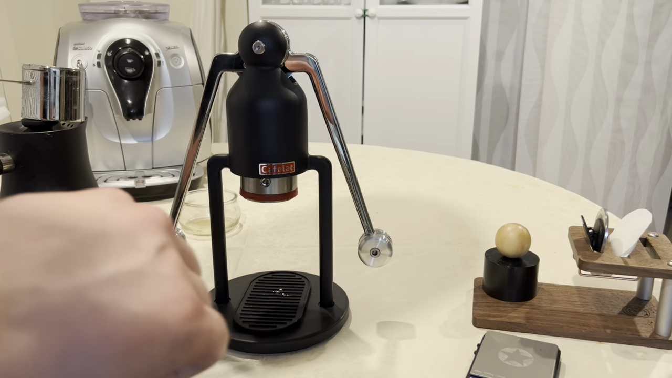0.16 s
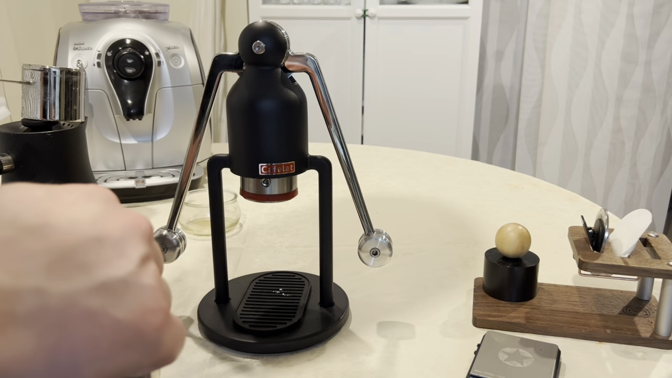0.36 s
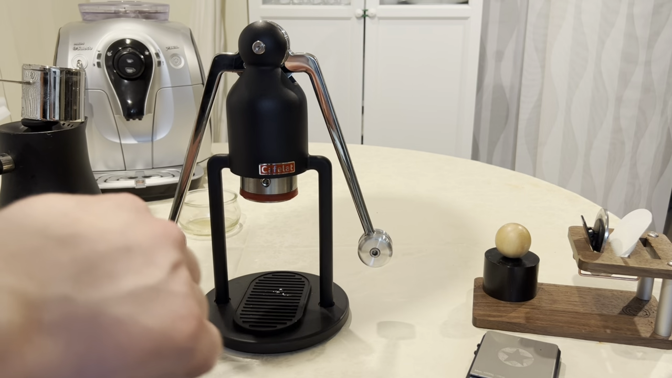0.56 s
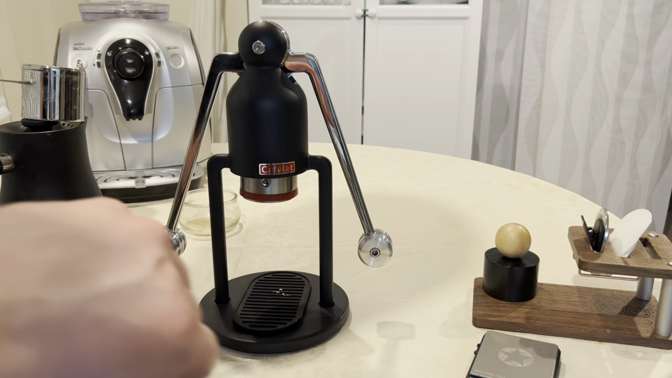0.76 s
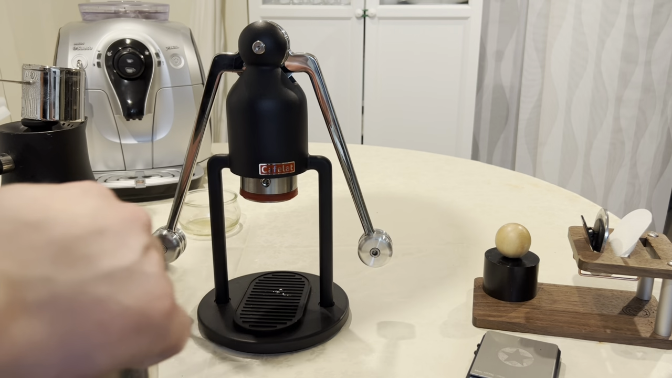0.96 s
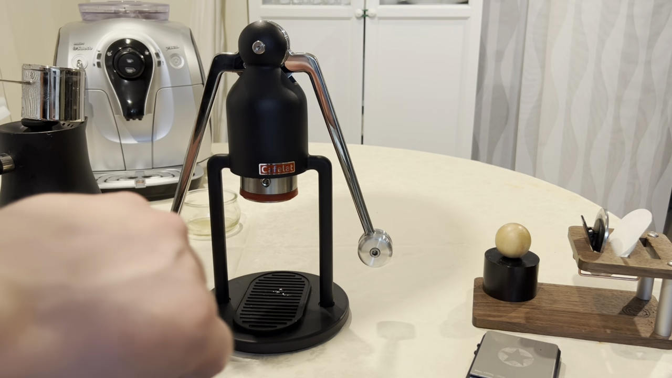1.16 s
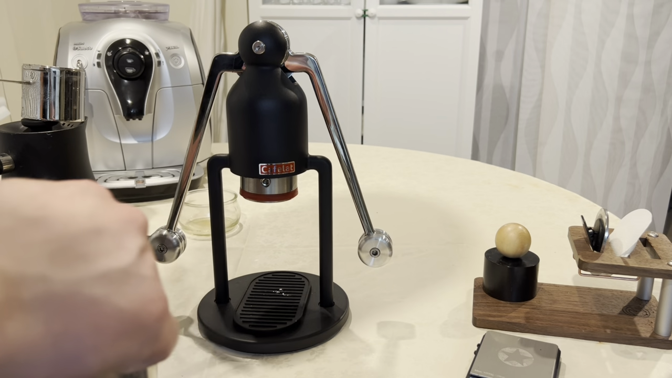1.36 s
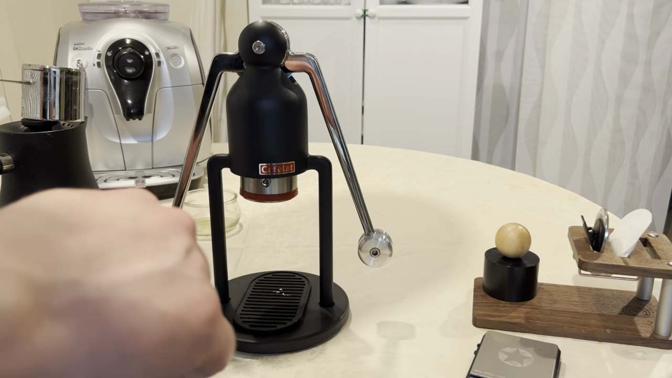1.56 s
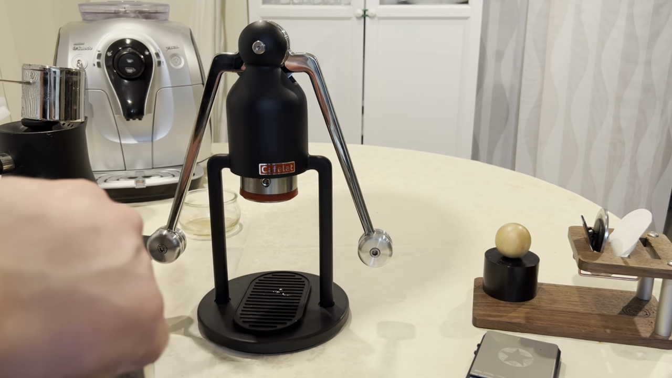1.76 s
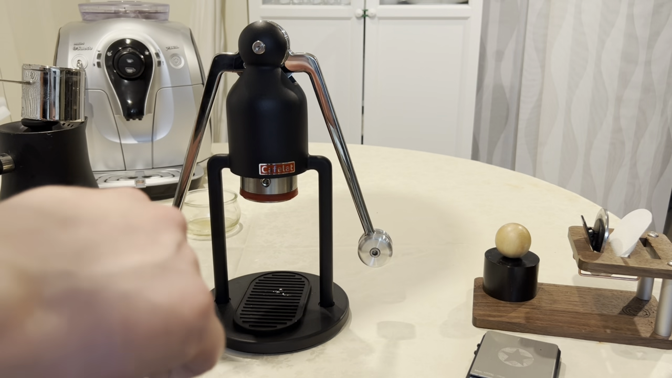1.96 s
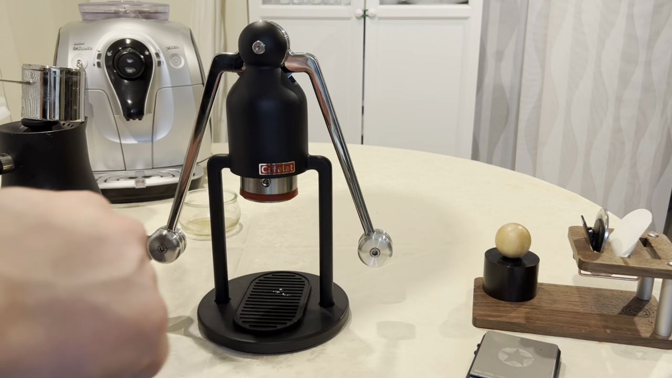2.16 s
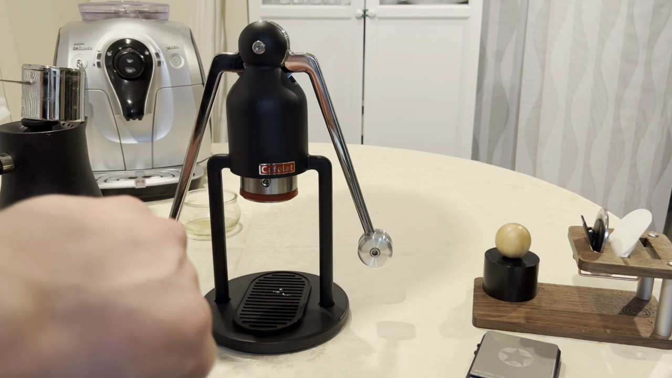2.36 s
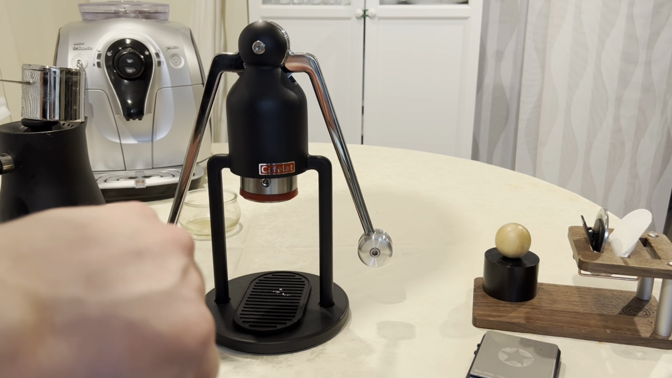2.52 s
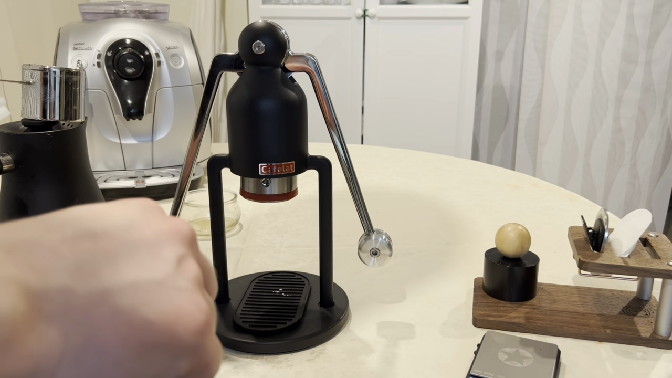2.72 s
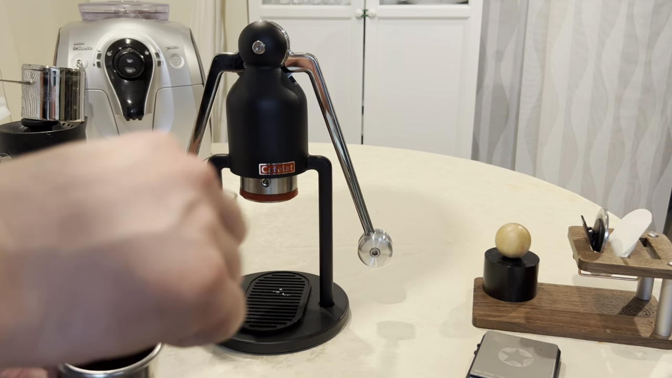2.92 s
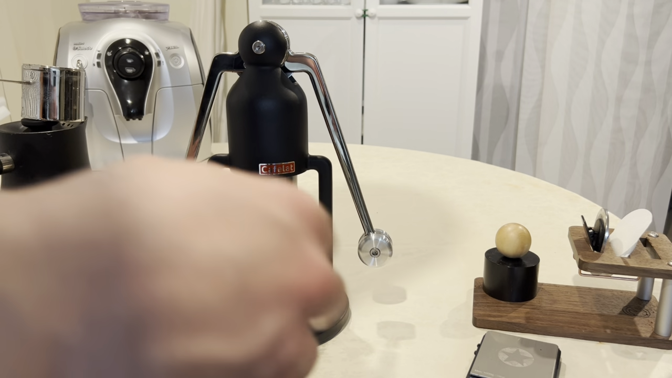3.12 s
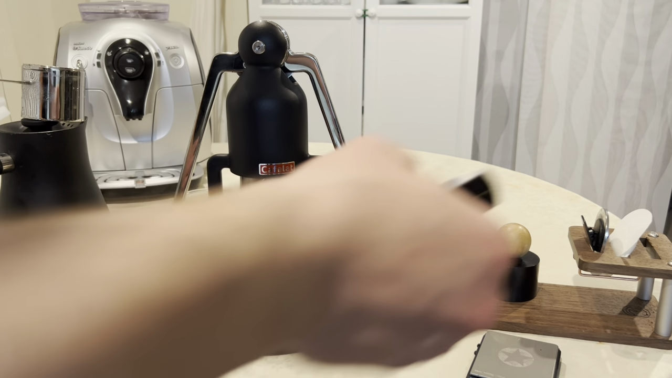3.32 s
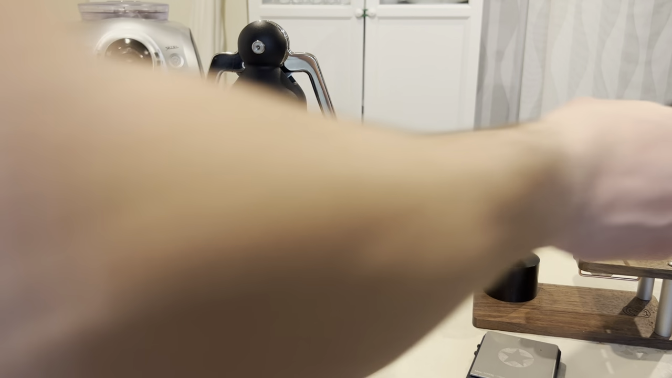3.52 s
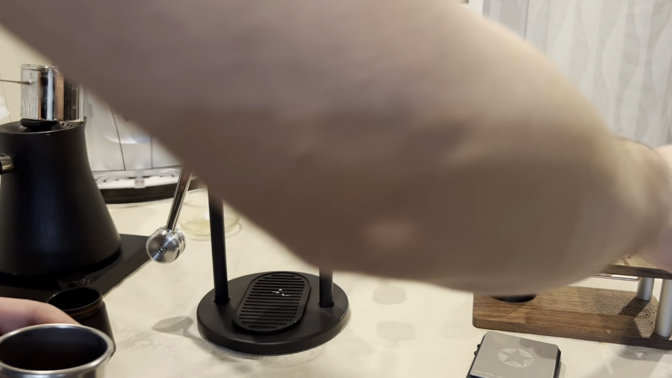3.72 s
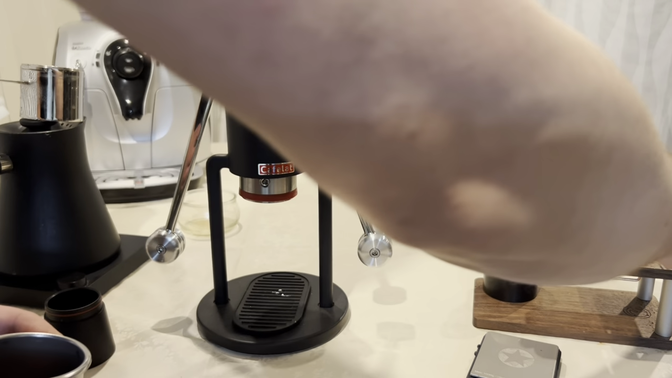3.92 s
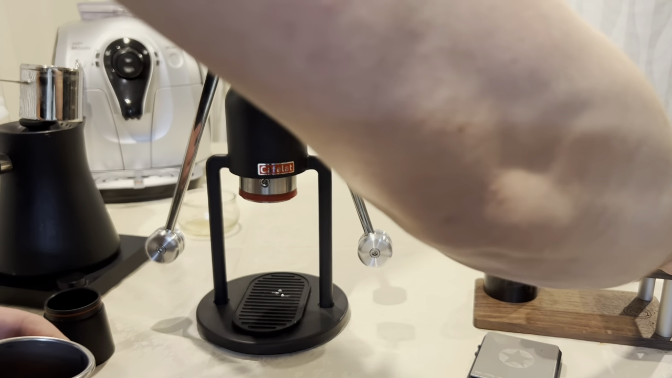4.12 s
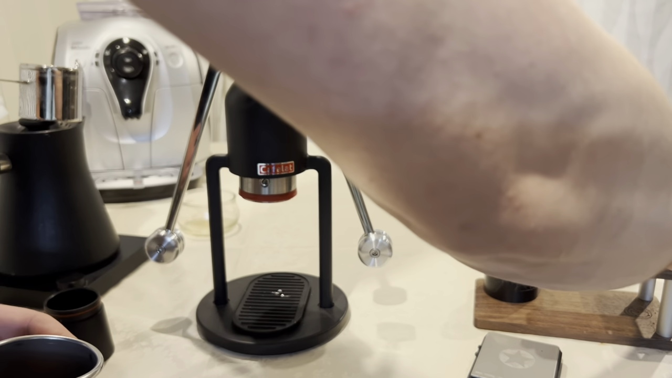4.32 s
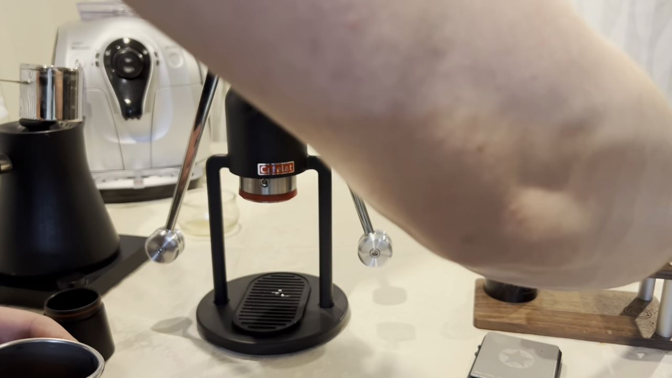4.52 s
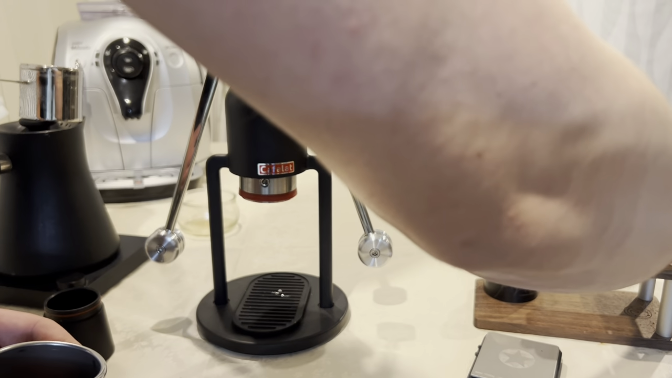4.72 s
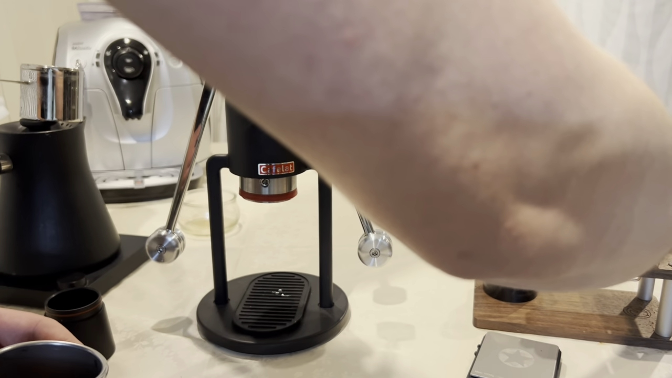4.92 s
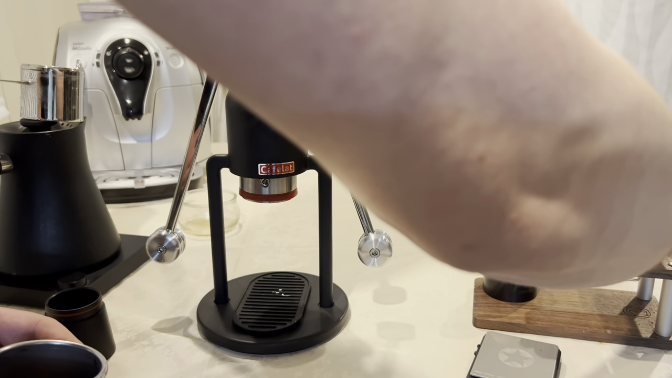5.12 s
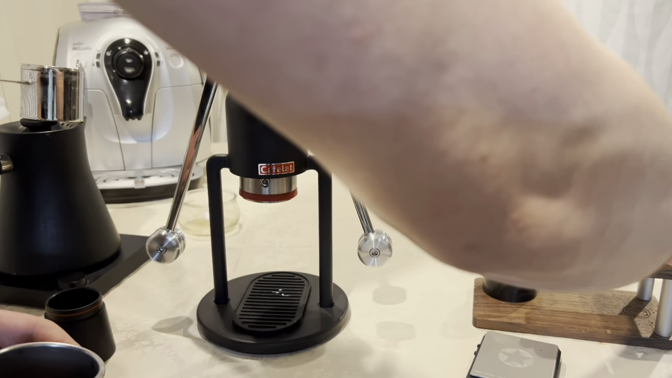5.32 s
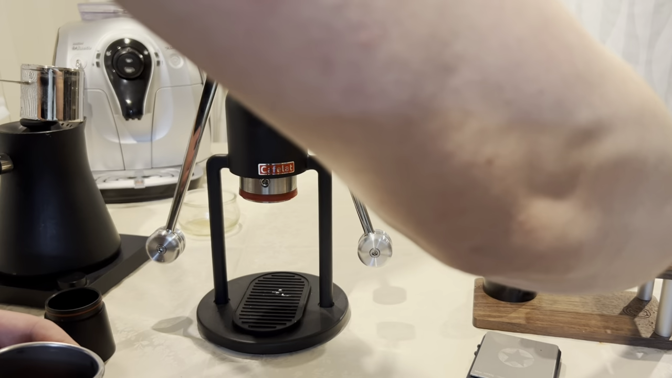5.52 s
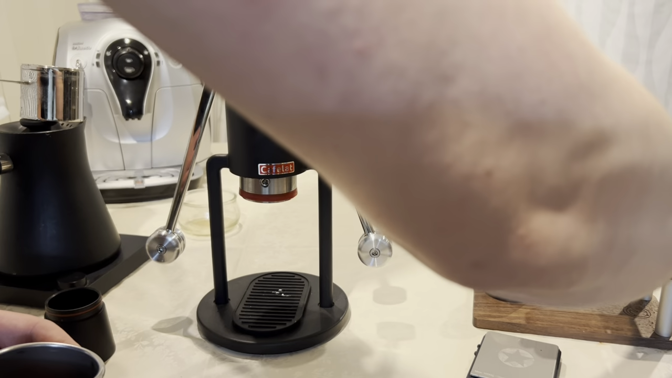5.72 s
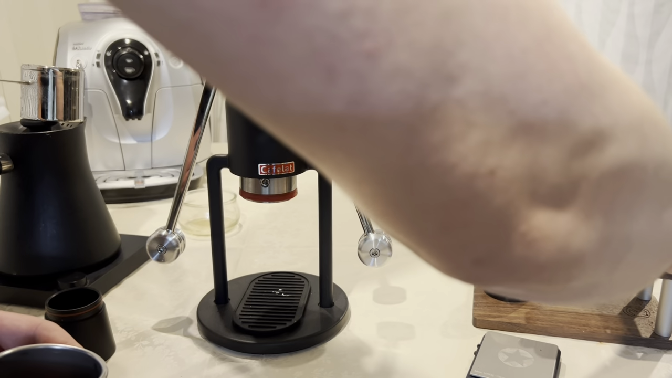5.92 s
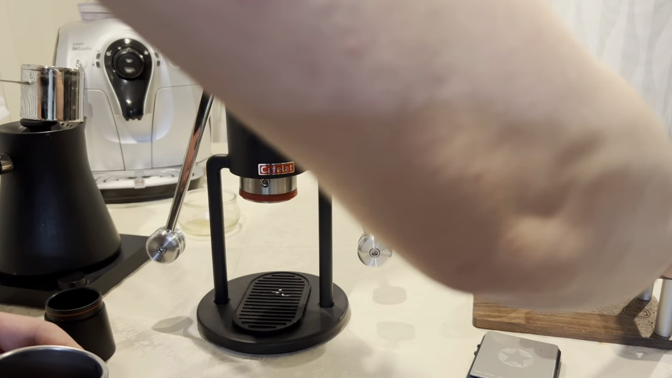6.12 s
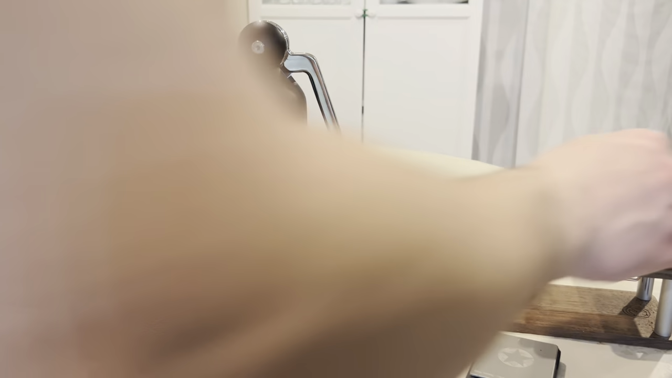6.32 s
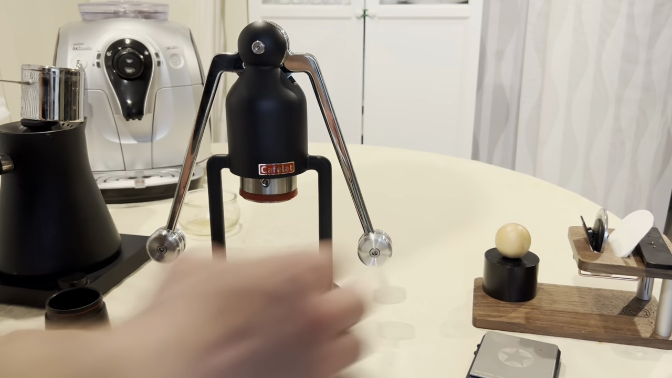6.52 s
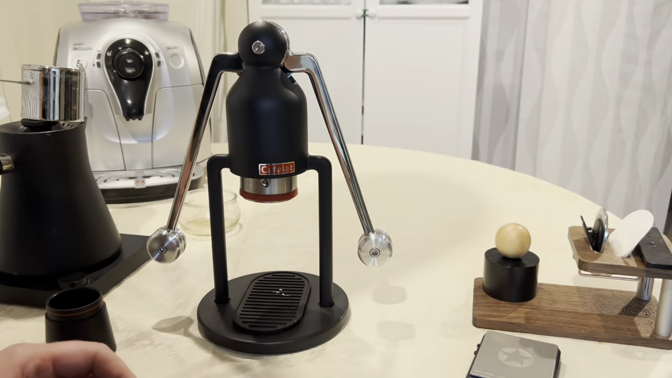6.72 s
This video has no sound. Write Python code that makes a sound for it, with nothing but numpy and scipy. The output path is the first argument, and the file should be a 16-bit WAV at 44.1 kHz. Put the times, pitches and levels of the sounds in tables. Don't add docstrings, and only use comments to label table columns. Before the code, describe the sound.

Fine needles scratch and tick through ground coffee in a small steel basket, a clink ends it, then a tool knocks into a wooden stand.

```python
import sys
import numpy as np
from scipy import signal
from scipy.fft import rfft, irfft, next_fast_len
from scipy.io import wavfile

SR = 44100
rng = np.random.default_rng(int(sys.argv[2]) if len(sys.argv) > 2 else 0)


def wrap_up_sound(samples):
    columns = np.atleast_2d(samples).T
    tamed = np.clip(columns, -1, 1)
    steps = np.round(tamed * 32767).astype(np.int16)
    wavfile.write(sys.argv[1], SR, steps)


def volts(x):
    e = np.asarray(x, float) / 20
    return 10 ** e


N = 298557
SIZE = next_fast_len(N + SR)
HZ = np.arange(SIZE // 2 + 1) * SR / SIZE

# start in seconds, peak in dB, thump in dB.
KNOCKS = [
    (5.994, -10.5, -49),
    (6.002, -16.5, -28),
    (6.018, -22.5, -31.5),
    (6.011, -9, -35.5),
    (6.039, -41, -29.5),
    (6.058, -12.5, -40),
    (6.072, -20.5, -38),
    (6.082, -38, -32.5),
    (6.099, -51, -30),
]
# pitch in Hz, phase in half turns.
PORTS = [(8200, 0), (9300, -.93), (11200, -1.08), (12600, -1.88), (14500, -2.05), (15300, -2.6)]


def rms_one(x):
    return x / np.sqrt(np.mean(x ** 2) + 1e-20)


def in_time(rows):
    s, *columns = np.transpose(rows)
    return [np.interp(np.arange(N) / SR, s, c) for c in columns]


def at_hz(points, hz=HZ):
    f, value = np.transpose(points)
    return np.interp(np.log(hz + 1), np.log(f + 1), value)


def coloured(spectrum, weight=1):
    white = rfft(rng.standard_normal(SIZE))
    return rms_one(irfft(white * volts(at_hz(spectrum)) * weight, SIZE)[:N])


def drift(rate):
    r = np.exp(-2 * np.pi * rate / SR)
    return rms_one(signal.lfilter([1], [1, -2 * r, r * r], rng.standard_normal(N + SR))[SR:])


def grains(per_s, spread_db):
    sizes = volts(spread_db * np.minimum(rng.exponential(1, N), 4)) * rng.choice([-1, 1], N)
    return rms_one(sizes * (rng.random(N) < per_s / SR))


def resonance(x, hz, width):
    r = np.exp(-np.pi * width / SR)
    gain = (1 - r * r) / 2
    return signal.lfilter([gain, 0, -gain], [1, -2 * r * np.cos(2 * np.pi * hz / SR), r * r], x)


def glide(x, hz, width):
    turn = np.exp(2j * np.pi * np.cumsum(hz) / SR)
    r = np.exp(-np.pi * width / SR)
    return 2 * np.real(signal.lfilter([1 - r], [1, -r], x / turn) * turn)


def ring(clicks, hz, t60):
    r, w = volts(-60 / (t60 * SR)), 2 * np.pi * hz / SR
    return signal.lfilter([0, np.sin(w)], [1, -2 * r * np.cos(w), r * r], clicks + 1e-18)


def bursts(times, levels_db, lengths):
    out, t = np.zeros(N + 4000), np.arange(4000) / SR
    onset = np.minimum(t / 0.001, 1)
    for s, db, length in zip(times, levels_db, lengths):
        fade = np.exp(-t / max(length, .001)) + 0.14 * np.exp(-t / 0.0011)
        out[round(s * SR):][:len(t)] += volts(db) * fade * onset
    return out[:N]


def struck(hits, modes, scatter_db, soft):
    out, at = 0, [round(s * SR) for s, db in hits]
    chance = rng.standard_normal((len(hits), len(modes)))
    for k, (hz, db, t60) in enumerate(modes):
        strength_db = np.array(hits)[:, 1] + db + scatter_db * chance[:, k]
        clicks = np.zeros(N)
        clicks[at] = volts(strength_db) * np.sign(np.sin(9 * chance[:, k]))
        out = out + ring(clicks, hz, t60)
    return signal.lfilter([(1 - soft) ** 2], [1, -2 * soft, soft ** 2], out)


def kitchen():
    # time in seconds, rumble in dB.
    hum = [(0, -54), (.5, -59.5), (.8, -54.5), (.9, -69), (1.4, -66), (2.26, -68.5), (2.47, -58),
           (3.04, -58), (3.07, -62.5), (3.3, -68), (3.46, -69.5), (3.5, -72), (4.35, -70.5), (5.07, -58.5),
           (5.77, -58), (6.05, -53), (6.25, -55), (6.77, -61.5)]
    # pitch in Hz, level in dB per Hz.
    rumble = [(15, -55), (25, -15.5), (59, -4), (123, -6.5), (189, -5), (210, -10), (240, -2.5),
              (334, -1.5), (387, -17), (600, -19), (780, -48), (1320, -120)]
    # pitch in Hz, level in dB.
    air = [(240, -34), (400, 6), (600, -5), (1040, -7), (1730, -3.5), (2550, -17.5), (4050, -20),
           (6740, -22.5), (9000, -25), (11500, -13.5), (13500, -24.5), (15000, -16.5), (16000, -35)]
    # pitch in Hz, level in dB.
    air_side = [(240, -48), (400, -17), (620, -3), (840, -16.5), (1730, -13), (2550, -28.5), (6500, -32),
                (7600, -36.5), (9000, -34.5), (11600, -30), (12700, -52.5), (14300, -55.5), (15200, -32.5),
                (16000, -50.5)]
    # pitch in Hz, level in dB.
    whine = [(581.4, -92.5), (699.8, -91)]
    rumble_db, = in_time(hum)
    rumble_gain = volts(rumble_db - 2.0 + 3.2 * drift(5.4))
    air_db = -75.0 + 0.16 * (rumble_db + 63.0)
    t = np.arange(N) / SR
    tones = sum(volts(db + 6.0) * np.sin(2 * np.pi * hz * t) for hz, db in whine)
    alike = np.cos(np.pi * at_hz(PORTS) / 2) + 0.084
    mid = rumble_gain * coloured(rumble) + volts(air_db) * coloured(air, alike) + tones
    mid = mid + volts(-98 + 3 * drift(15)) * rms_one(resonance(rng.standard_normal(N), 13700, 200))
    side = rumble_gain * volts(-13.5) * coloured(rumble)
    side = side + volts(air_db - 0.5) * coloured(air_side) + .8 * tones
    return np.array([mid + side, mid - side])


def basket():
    # time in seconds, pressure in dB, rubbing on the wall in dB
    # re pressure, pitch of the air in the cup in Hz.
    stir = [(0.0, -50.5, -18.5, 1110), (0.14, -60, -8.5, 1000), (0.22, -57, -13, 1100),
            (0.32, -49, -8.5, 1046), (0.45, -59, -12, 980), (0.6, -49, -15, 1033), (0.72, -60, -52, 1000),
            (0.86, -48, -4, 980), (0.95, -54, -14.5, 964), (1.1, -52, -11, 1052), (1.18, -54.5, -36, 950),
            (1.26, -48.5, -6, 1076), (1.35, -52.5, -15.5, 974), (1.63, -54.5, -11.5, 1025),
            (2.0, -50.5, -13, 1024), (2.16, -53.5, -11, 1047), (2.25, -46.5, -13.5, 1006),
            (2.33, -44, -4, 1030)]
    # start in seconds, strength in dB, place (0 floor, 1/3 rim, 2/3 wall
    # and round again), scrape length in seconds.
    catches = [(0.031, -52, 0.02, 0.0091), (0.062, -46, 0.068, 0.023), (0.1, -46, 0.44, 0.032),
               (0.12, -30.5, 0.81, 0.0071), (0.182, -46.5, 0.45, 0.023), (0.209, -32.5, 0.84, 0.0082),
               (0.26, -55, 0.76, 0.0087), (0.29, -36.5, 0.058, 0.013), (0.336, -50, 1, 0.02),
               (0.473, -45, 0.13, 0.1), (0.52, -25.5, 0.79, 0.0076), (0.533, -48, 0.071, 0.0066),
               (0.576, -43, 0.85, 0.061), (0.704, -39.5, 0.42, 0.01), (0.7771, -27, 0.42, 0.011),
               (0.785, -29, 0.58, 0.011), (0.824, -36, 0.67, 0.0048), (1.026, -43, 0.14, 0.055),
               (1.062, -37, 0.85, 0.0082), (1.089, -37.5, 0.56, 0.025), (1.184, -36, 0.37, 0.0098),
               (1.2449, -28.5, 0.56, 0.013), (1.308, -44, 0.84, 0.032), (1.361, -46.5, 1, 0.0087),
               (1.42, -44, 0.02, 0.0043), (1.432, -46.5, 0.02, 0.0091), (1.5075, -40, 0.57, 0.022),
               (1.675, -39, 0.53, 0.017), (1.704, -44, 0.88, 0.046), (1.92, -32.5, 0.78, 0.014),
               (2.081, -31, 0.86, 0.0075)]
    # start in seconds, strength in dB, place, length in seconds.
    last_catches = [
        (2.19, -47, 0.01, 0.04),
        (2.225, -46, 0.2, 0.045),
        (2.283, -32.5, 1, 0.0088),
        (2.483, -51, 0.05, 0.004),
        (2.692, -53.5, 0.11, 0.01),
        (2.762, -61.5, 0.023, 0.014),
    ]
    # start in seconds, peak in dB.
    twangs = [(0.114, -65), (0.522, -49.5), (0.5795, -79), (0.779, -52.5), (0.826, -59), (1.2434, -60),
              (1.317, -59.5), (1.7173, -65), (1.92, -78.5), (2.23, -65), (2.2854, -43), (2.298, -45.5)]
    # pitch in Hz, width in Hz, level in dB.
    cup = [(810, 360, -6.5), (1000, 149, 8), (1110, 300, -10.5)]
    # pitch in Hz, width in Hz, level in dB.
    rim = [(1584, 238, 1), (1764, 190, 4.5), (2163, 170, -10.5)]
    # pitch in Hz, width in Hz, level in dB.
    wall = [(2640, 450, -15.5), (3650, 180, 9), (3636, 560, -3), (5090, 180, -5), (6124, 160, -3),
            (6400, 170, -32)]
    # pitch in Hz, width in Hz, level in dB.
    needles = [(8350, 450, -14), (9430, 200, -3), (10850, 64, 7.5), (10630, 290, 2.5), (12000, 120, -3.5),
               (13500, 240, -6.5), (14200, 450, -11)]
    s, db, place, length = np.transpose(catches + last_catches)
    cup_db, rim_db, wall_db = [db - 7.5 * (1 - np.cos(2 * np.pi * (place - k / 3))) for k in range(3)]
    twang_s, twang_db = np.transpose(twangs)
    twang_length = np.full(len(twang_s), 0.009)

    pressure, on_wall, cup_hz = in_time(stir)
    needle_db = -64 + 0.37 * (pressure + on_wall + 66)
    t = np.arange(N) / SR
    lifted_s = np.maximum(t - 2.242, 0)
    lift_db = -121 * lifted_s
    trickle_db = pressure - 60 * lifted_s - 620.0 * np.maximum(t - 2.485, 0)
    pressure = pressure + lift_db
    rim_rub_db = pressure - 12.5 + 3 * drift(1.7)
    rub, scrape, surge = grains(5000, spread_db=0.0), grains(4000, spread_db=2.0), drift(24)
    parts = [(cup, trickle_db, s, cup_db + 1.0, length),
             (rim, rim_rub_db, s, rim_db - 3.0, length),
             (wall, pressure + on_wall, s, wall_db - 6.0, length),
             (needles, needle_db + lift_db, twang_s, twang_db + 10, twang_length)]
    chance, out = rng.standard_normal((len(s), 4, 8)), 0
    for part, (peaks, steady_db, at, catch_db, lasting) in enumerate(parts):
        power = sum(volts(2 * db) * np.pi * width / SR for hz, width, db in peaks)
        for k, (hz, width, db) in enumerate(peaks):
            steady = volts(steady_db + 1.5 * surge + 3.09 * drift(26)) * rub
            noisy_db = 1.9 * np.log2(width / 200)
            mix_db = 2.5 * chance[:len(at), part, k]
            push = steady + bursts(at, catch_db + noisy_db + mix_db, lasting) * scrape
            if part == 0:
                sound = glide(push, hz * cup_hz / 1000, width)
            else:
                sound = resonance(push, hz, width)
            out = out + (-1) ** k * volts(db) * sound / np.sqrt(power)
    grit = bursts(s, wall_db - 20.5, 0.21 * length) * scrape
    return out + signal.sosfilt(signal.butter(2, (1799, 6990), "band", fs=SR, output="sos"), grit)


def tips():
    # start in seconds, peak in dB, centre pitch in Hz.
    strikes = [(0.031, -46, 1200), (0.1047, -49, 2200), (0.1166, -35.5, 2960), (0.121, -50, 5500),
               (0.182, -48, 3000), (0.2114, -40.5, 5800), (0.2937, -52, 2500), (0.5212, -35, 1744),
               (0.7048, -43, 2210), (0.7801, -31.5, 1620), (0.7904, -28.5, 1610), (1.0604, -52, 2500),
               (1.0894, -54, 2500), (1.1847, -45, 2400), (1.2441, -36, 3700), (1.2504, -41, 1650),
               (1.3604, -59, 1800), (1.4254, -53, 1310), (1.5115, -57, 3620), (1.6821, -37.5, 3700),
               (1.9084, -47, 3660), (2.0756, -38, 2410), (2.080, -39, 5800), (2.0817, -41, 1100),
               (2.0874, -43.5, 4105), (2.4798, -52, 2200), (2.4854, -50, 1000), (2.6908, -58.5, 2980),
               (2.693, -51.5, 1000), (2.7684, -59, 4500)]
    # pitch in Hz, level in dB, time to fall 60 dB in seconds.
    tip_ring = [(947, 2.5, 0.025), (1200, -3, 0.056), (1650, 1, .03), (3650, -5.5, .06), (4920, -18, 0.021),
                (5820, -20.5, .04)]
    out, clicks, click = np.zeros(N), np.zeros(N), np.eye(1, 400)[0]
    for s, db, hz in strikes:
        width = 0.66 * hz
        tick = resonance(resonance(click, hz, width), hz, width)
        out[round(s * SR):][:len(click)] += volts(db - 1) * tick / tick.max()
        clicks[round(s * SR)] = volts(db - 8.5)
    return out + sum(volts(db) * ring(clicks, hz, t60) for hz, db, t60 in tip_ring)


def clink():
    # start in seconds, peak in dB, bright top in dB.
    clinks = [
        (0.522, -30, -58),
        (2.2859, -12.5, -20),
        (2.299, -21.5, -39),
    ]
    # pitch in Hz, level in dB, time to fall 60 dB in seconds.
    held_rim = [(804, -11, 0.02), (1160, -2.5, 0.035), (1432, -6.5, 0.023), (3400, -5, 0.032),
                (3470, -20.5, 0.031), (6050, -4.5, 0.025), (7500, -14, .02), (12100, -12.5, 0.045)]
    # start in seconds, level in dB.
    pings = [
        (2.693, -67.5),
        (2.855, -59.5),
        (2.88, -87),
    ]
    s, db, top_db = np.transpose(clinks)
    grit = coloured([(500, -30), (1000, -3), (3000, -8.5), (7500, -5), (15500, -5.0)])
    top = coloured([(7000, -29), (9500, -3), (12000, -8.5), (15500, -8.0)])
    crack = bursts(s, db - 3.5, np.full(len(s), .0013)) * grit
    crack = crack + bursts(s, top_db + 4.5, np.full(len(s), .0012)) * top
    modes = struck(list(zip(s, db - 11.5)), held_rim, scatter_db=3.5, soft=.1)
    flick = bursts(*np.transpose(pings), np.full(len(pings), .015)) * rng.standard_normal(N)
    faint = volts(18.5) * resonance(resonance(flick, 3670, 73), 3670, 300)
    return crack + modes + faint


def brush():
    # time in seconds, hiss in dB, lower squeak in Hz,
    # upper squeak in Hz.
    slide = [
        (2.74, -115, 8400, 12000),
        (2.762, -55, 8600, 12000),
        (2.785, -62, 8740, 13600),
        (2.82, -60, 8900, 14400),
        (2.84, -53, 8000, 14100),
        (2.86, -58.5, 8040, 12300),
        (2.885, -78, 7910, 12340),
        (2.92, -103, 8100, 12100),
    ]
    hiss_db, low_hz, high_hz = in_time(slide)
    t = np.arange(N) / SR
    gate = (t > slide[0][0]) & (t < slide[-1][0])
    hiss = coloured([(3000, -38.0), (6500, -29), (8300, -8), (11000, 9.5), (14000, -5), (15500, 11)])
    white = rng.standard_normal(N)
    squeaks = volts(-17.5) * rms_one(glide(white, low_hz, 200))
    squeaks = squeaks + volts(-13.5) * rms_one(glide(white, high_hz, 900))
    return gate * volts(hiss_db) * (volts(-2) * hiss + squeaks)


def touches(rows, own_hz, seat_db, seat_width):
    out, t = np.zeros((2, N)), np.arange(4000) / SR
    noise = rng.standard_normal((len(rows), len(t)))
    top = signal.butter(2, [11000, 15800], "band", fs=SR, output="sos")
    broad = signal.butter(2, [2500, 10500], "band", fs=SR, output="sos")
    for (s, db, seat_hz, top_db, contact), g in zip(rows, noise):
        tick = np.minimum(t / 0.0013, 1) * np.exp(-t / contact)
        rustle = tick + volts(-6) * np.exp(-t / 0.022)
        seat = volts(seat_db + 13.5) * resonance(g * tick, seat_hz, seat_width)
        hz = own_hz * (1 + 0.012 * g[-1])
        grit = volts(8) * resonance(g * tick, hz, 630)
        grit = grit + volts(-15.0) * signal.sosfilt(broad, g * rustle)
        grit = grit + volts(top_db + 6.0) * signal.sosfilt(top, g * rustle)
        out[:, round(s * SR):][:, :len(t)] += volts(db) * np.array([seat, grit])
    return out


def collar_taps():
    # start in seconds, peak in dB, pitch of the seat in Hz, brightness in dB.
    taps = [(3.7017, -79, 3255, -0.5), (3.894, -74.5, 6900, -9), (4.026, -72.5, 3170, -13.5),
            (4.161, -64.5, 3770, -1), (4.1855, -64, 3770, -8), (4.372, -68.5, 3720, -3),
            (4.528, -65, 3030, -14), (4.9603, -70.5, 2950, -3), (5.057, -73, 6950, 6),
            (5.0934, -62, 3400, -38), (5.145, -68.5, 2900, -8), (5.2606, -71, 3500, -17),
            (5.3273, -74, 3350, -12.5), (5.4158, -57, 3340, -33.5), (5.976, -58.5, 6670, -2),
            (6.0474, -46, 2920, 0)]
    contact_s = 0.008
    rows = [(*row, contact_s) for row in taps]
    return touches(rows, own_hz=6400, seat_db=4.5, seat_width=170.0)


def needle_ticks():
    # start in seconds, peak in dB, pitch of the seat in Hz, brightness in dB,
    # contact in seconds.
    ticks = [(4.2026, -52.5, 3650, -12, 0.0077), (4.2244, -47, 3100, -35, 0.0023),
             (4.3233, -57, 3070, -25, 0.0043), (4.3884, -49.5, 3820, -34, 0.0031),
             (4.436, -53, 4300, -28, 0.0034), (4.4605, -38, 3170, -23, 0.0037),
             (4.7284, -39, 3060, -25, 0.0012), (4.7877, -42.5, 3400, -14.5, 0.0013),
             (4.976, -52.5, 4740, -24, 0.002), (5.3857, -37.5, 2870, -20, 0.0017),
             (5.5535, -51, 4667, -5.5, 0.014), (6.0623, -37.5, 2900, -22, 0.003),
             (6.0975, -44.5, 4140, -12.5, 0.0055)]
    return touches(ticks, own_hz=8600, seat_db=-5.5, seat_width=73.0)


def stand():
    # start in seconds, peak in dB.
    nudges = [
        (5.061, -45),
        (5.117, -60),
    ]
    # pitch in Hz, level in dB, time to fall 60 dB in seconds.
    stand_modes = [(930, -14, .05), (1165, -5.5, 0.074), (1315, -8, 0.093), (1491, -8.5, 0.06),
                   (1920, -9.5, .05), (2003, 0.5, 0.1), (2057, -3.5, 0.056), (2145, -3.5, 0.095),
                   (2290, -8, 0.042), (2794, -2, 0.059), (3060, -4.5, .04), (3955, 0, 0.013),
                   (4140, -14.5, 0.067), (6120, -19, 0.081)]
    # pitch in Hz, level in dB, time to fall 60 dB in seconds.
    shelf_modes = [(175.4, -6.5, 0.39), (216, -3.5, 0.27), (404, -6, 0.065)]
    # pitch in Hz, level in dB, time to fall 60 dB in seconds.
    handle_modes = [(208, 3.5, 0.29), (1097, -4, 0.13), (2130, -0.5, 0.085), (3363, 6.5, 0.059)]
    s, db, thump_db = np.transpose(KNOCKS)
    wood = struck(list(zip(s, db - 16.5)), stand_modes, scatter_db=1.0, soft=0.086)
    chatter = bursts(s, db - 40, np.full(len(s), .009))
    for hz, mode_db, t60 in stand_modes:
        wood = wood + volts(mode_db) * ring(chatter * rng.standard_normal(N), hz, 0.28 * t60)
    thump = struck(list(zip(s + 0.0042, thump_db - 4.0)), shelf_modes, scatter_db=3.0, soft=0.95)
    grit = coloured([(600, -11), (1200, -1.5), (4000, -13.0), (8000, -17.0), (15000, -25.5)])
    crack = bursts(s, db - 18.0, np.full(len(s), .004)) * grit
    nudge = struck([(at, peak_db - 9) for at, peak_db in nudges], handle_modes, scatter_db=0, soft=.15)
    return wood + thump + crack, nudge


def collar():
    # pitch in Hz, level in dB, time to fall 60 dB in seconds.
    collar_modes = [(1965, -15.5, .27), (2012, -14.5, .4), (2245, -17, .3), (2796, -11, 0.24),
                    (4130, -23.5, 0.22), (4170, -18, .25), (6060, -27, .2), (5860, -28, .18)]
    s, db, thump_db = np.transpose(KNOCKS)
    clicks = np.zeros(N)
    clicks[np.round(s * SR).astype(int)] = volts(db - 16.5)
    return sum(volts(mode_db) * ring(clicks, hz, t60) for hz, mode_db, t60 in collar_modes)


def heard(x, sent, lead, tilt, room_db):
    # pitch in Hz, time to fall 60 dB in seconds.
    room_t60 = [(1000, 0.33), (3000, 0.28), (6000, 0.34), (12000, 0.18)]
    t, echo = np.arange(SR // 2) / SR, 0
    edges = 125 * 2 ** np.arange(0, 7.2, .5)
    white = rng.standard_normal((2, len(t))) * np.minimum(t / 0.0074, 1)
    for low, high in zip(edges, edges[1:]):
        band = signal.sosfilt(signal.butter(2, [low, high], "band", fs=SR, output="sos"), white)
        echo = echo + band * volts(-60 * t / at_hz(room_t60, np.sqrt(low * high)))
    common, own = rfft(echo, SIZE) / np.sqrt(np.sum(echo ** 2) / 2) * volts(room_db)
    no_bass = 1 / (1 + (450 / (HZ + 1)) ** 4)
    no_top = 1 / (1 + (HZ / 6000) ** 12)
    common = common * no_bass / (1 + (HZ / 9000) ** 2)
    spread = no_top + 0.4 * np.cos(np.pi * at_hz(PORTS) / 2) ** 2 + 0.39
    own = own * 0.58 * no_bass * spread
    phase = no_top * at_hz(lead) + np.pi * at_hz(PORTS)
    half = volts(no_top * at_hz(tilt) / 2) * np.exp(.5j * phase)
    near, far = rfft(x, SIZE), rfft(sent, SIZE)
    left = (near + far * (common + own)) * half
    right = (near + far * (common - own)) / half
    return irfft(np.array([left, right]), SIZE)[:, :N]


def scene():
    # pitch in Hz, lead in radians.
    left_lead = [(100, 0.066), (780, 1.3), (1810, 0.9), (3100, 1.6), (4130, 1.1), (5000, 2), (6200, 1.4)]
    # pitch in Hz, left over right in dB.
    left_tilt = [(300, -2.5), (700, 2.5), (1290, 7), (2380, 6), (4400, 6.5), (6400, 6.5)]
    # pitch in Hz, lead in radians.
    right_lead = [(100, 0.1), (1500, 0.248), (3500, 0.3), (5000, 1), (6400, 0.32)]
    # pitch in Hz, left over right in dB.
    right_tilt = [(300, 0.9), (700, 2.5), (1290, -1.8), (2380, 2), (4400, 5), (6400, 16)]
    stirred = signal.sosfilt(signal.butter(8, 14400, fs=SR, output="sos"), basket())
    held = stirred + tips() + clink() + brush()
    held = signal.sosfilt(signal.butter(2, 320, "high", fs=SR, output="sos"), held)
    seats, grit = collar_taps() + needle_ticks()
    knocks, nudge = stand()
    no_bass = signal.butter(2, 120, "high", fs=SR, output="sos")
    rings, rest = signal.sosfilt(no_bass, [seats + nudge, grit + knocks + collar()])
    to_room = volts(-8) * rings + rest
    at_left = heard(held, held, left_lead, left_tilt, room_db=-9)
    at_right = heard(rings + rest, to_room, right_lead, right_tilt, room_db=-5.0)
    return at_left + at_right + kitchen()


def roll_off(x):
    return signal.sosfilt(signal.butter(12, 16830, fs=SR, output="sos"), x)


def record(dry):
    cut = signal.sosfilt(signal.cheby2(10, 60, 16500, fs=SR, output="sos"), dry)
    return roll_off(cut)


dry = scene()
out = record(dry)
wrap_up_sound(out)
```